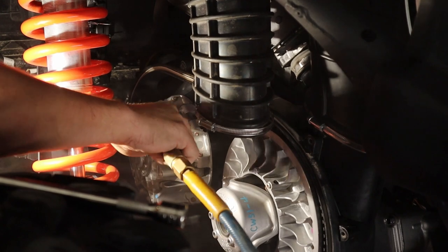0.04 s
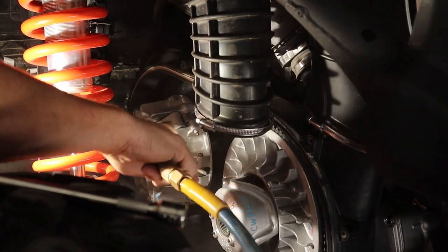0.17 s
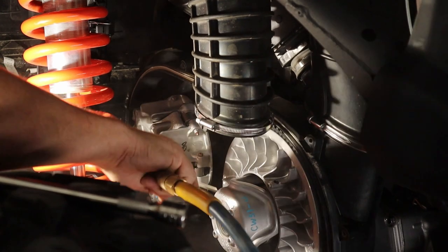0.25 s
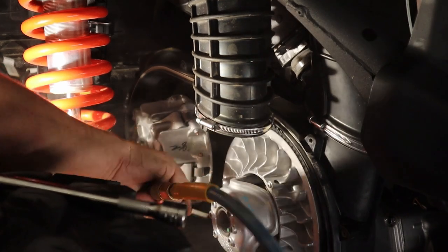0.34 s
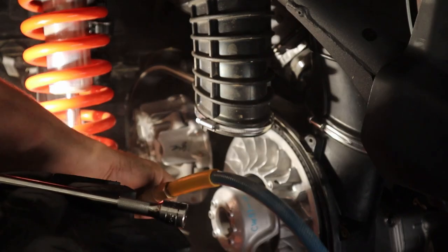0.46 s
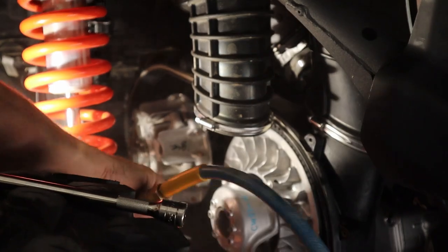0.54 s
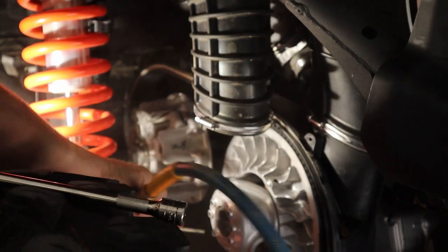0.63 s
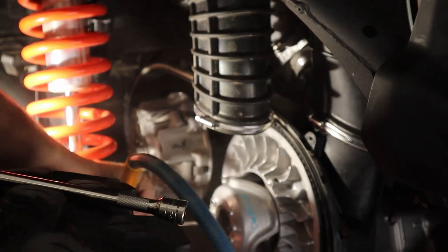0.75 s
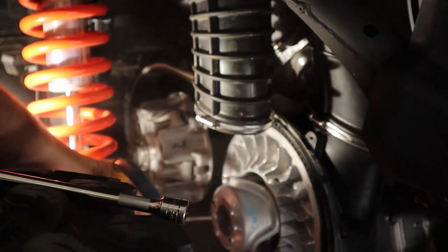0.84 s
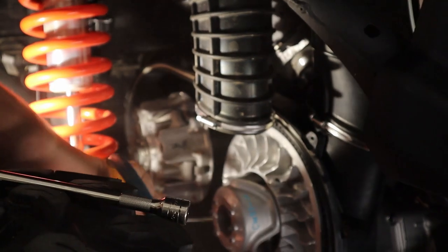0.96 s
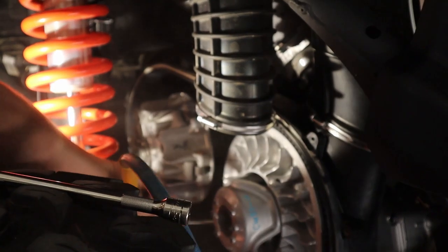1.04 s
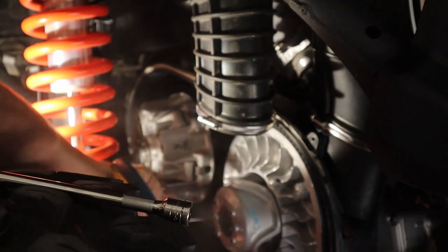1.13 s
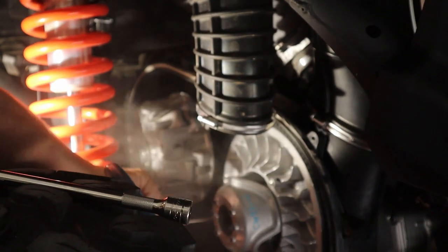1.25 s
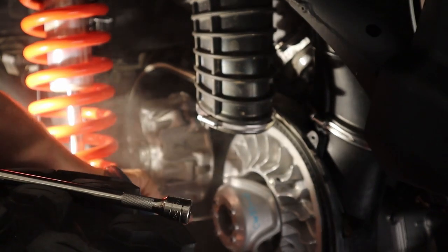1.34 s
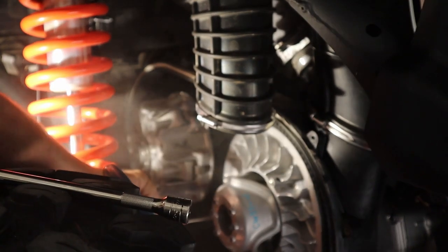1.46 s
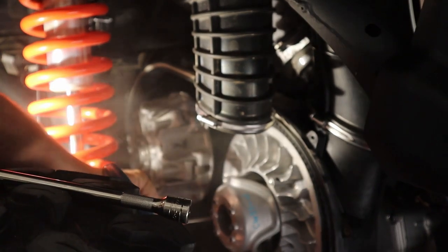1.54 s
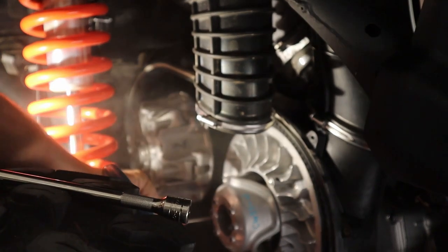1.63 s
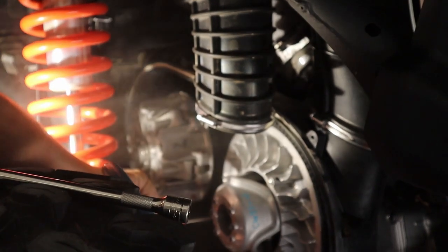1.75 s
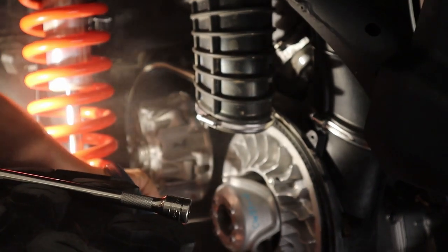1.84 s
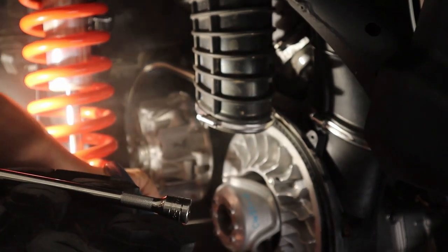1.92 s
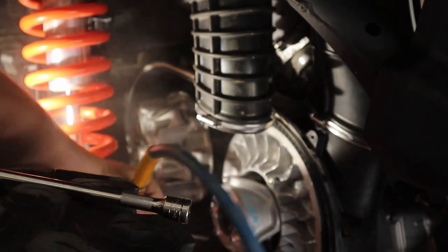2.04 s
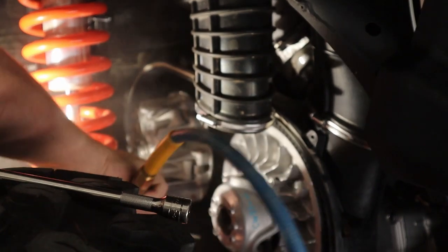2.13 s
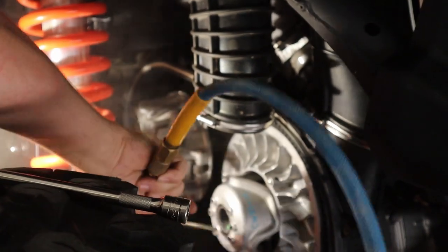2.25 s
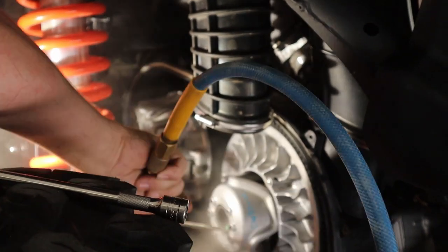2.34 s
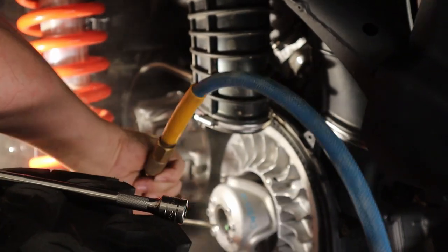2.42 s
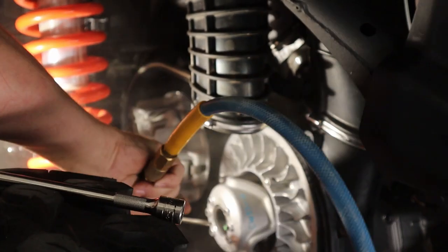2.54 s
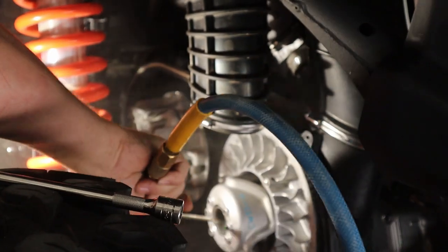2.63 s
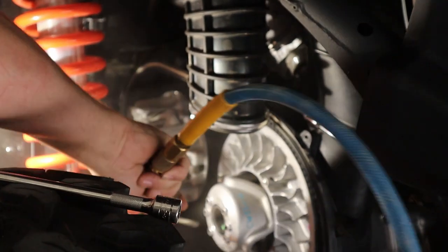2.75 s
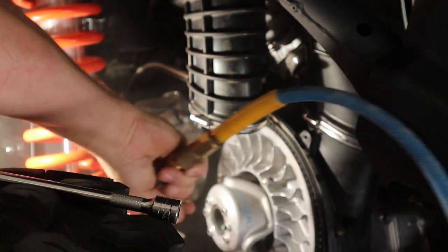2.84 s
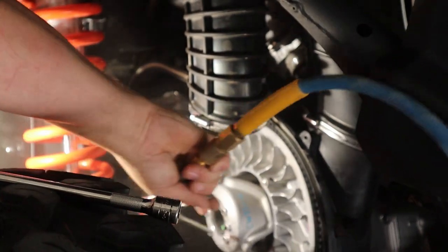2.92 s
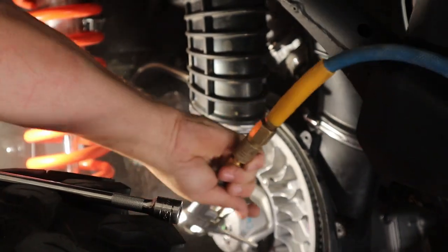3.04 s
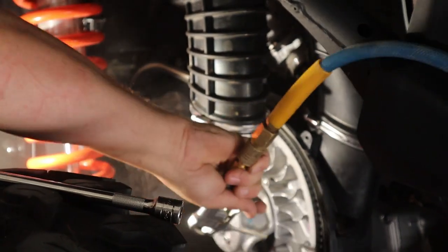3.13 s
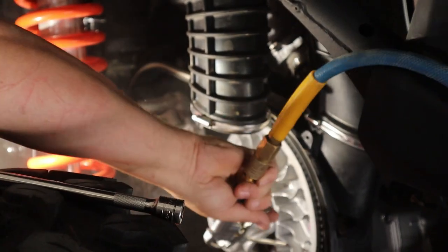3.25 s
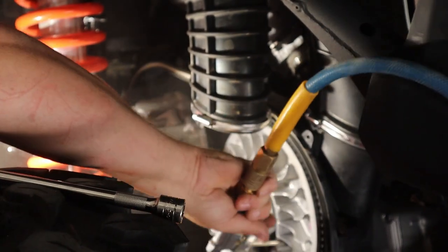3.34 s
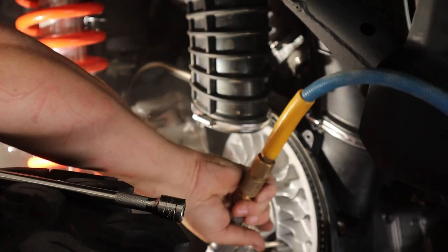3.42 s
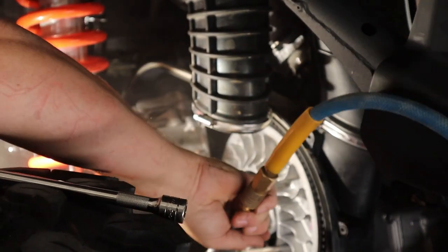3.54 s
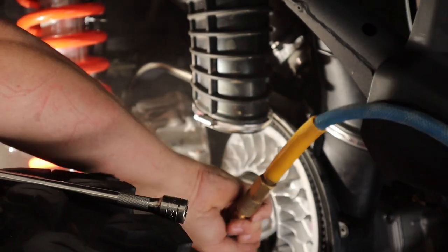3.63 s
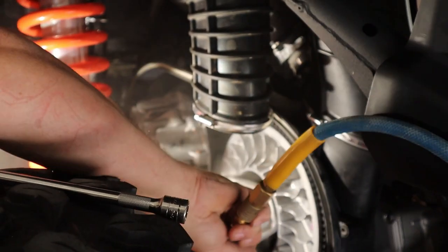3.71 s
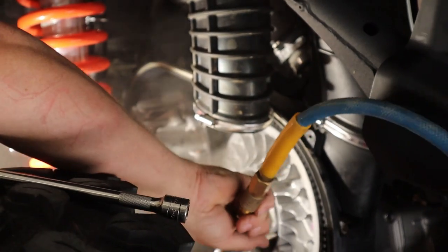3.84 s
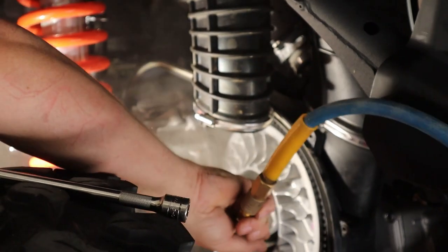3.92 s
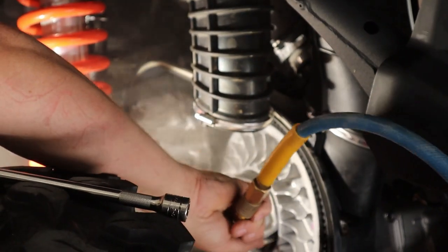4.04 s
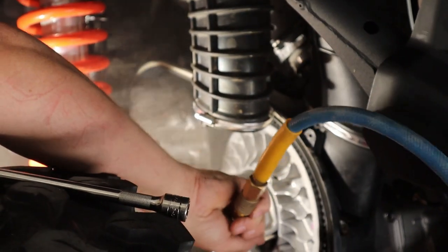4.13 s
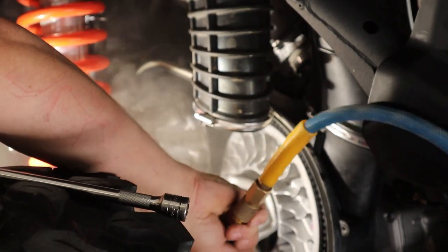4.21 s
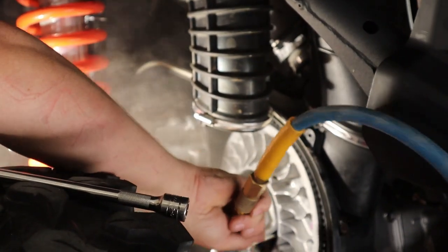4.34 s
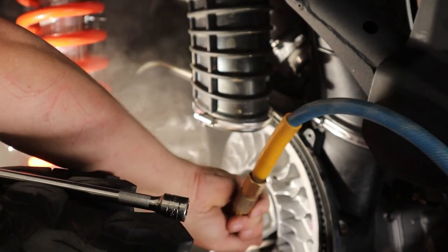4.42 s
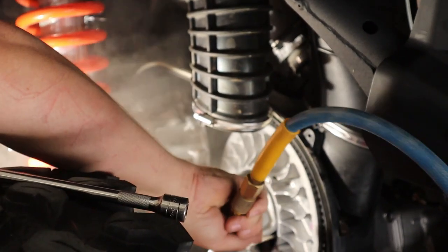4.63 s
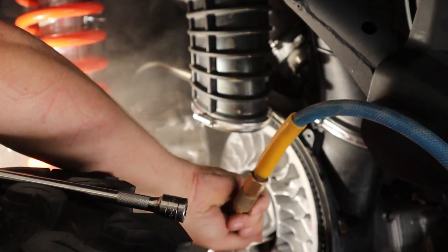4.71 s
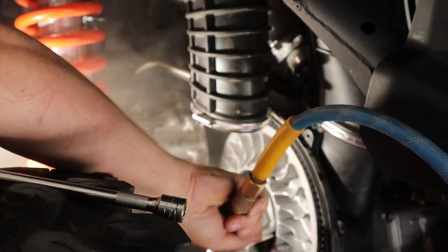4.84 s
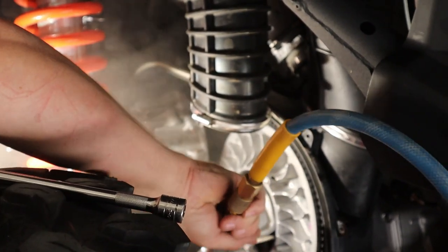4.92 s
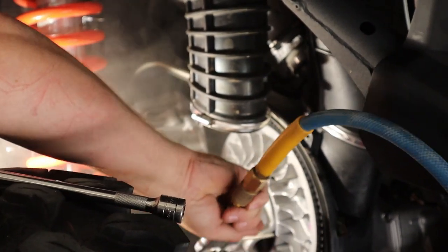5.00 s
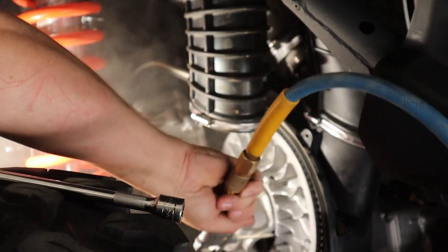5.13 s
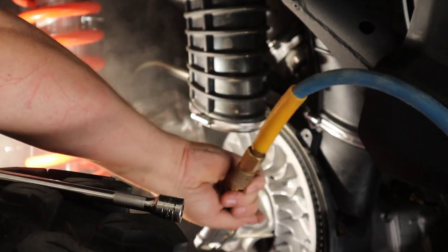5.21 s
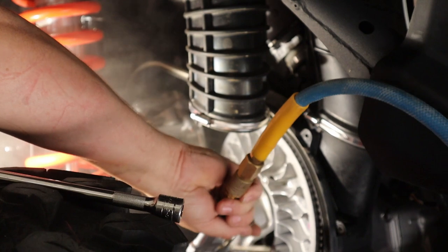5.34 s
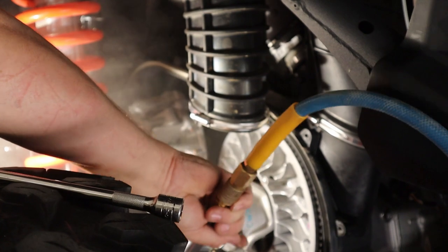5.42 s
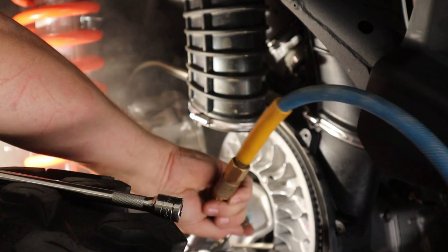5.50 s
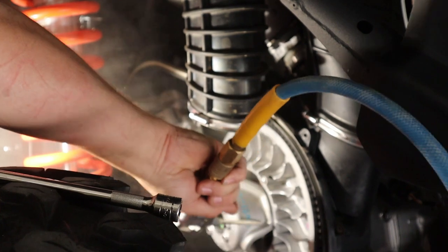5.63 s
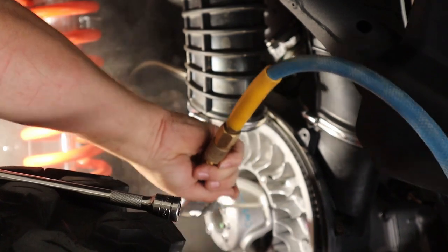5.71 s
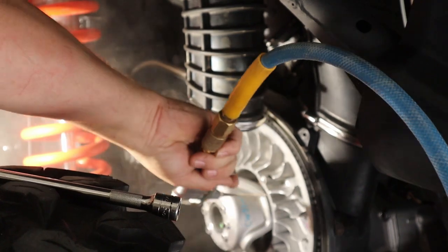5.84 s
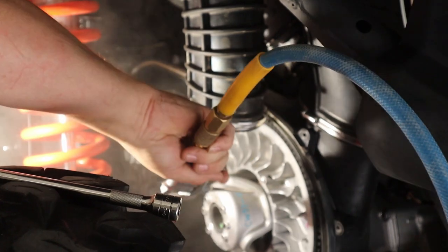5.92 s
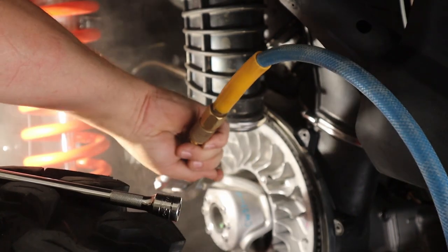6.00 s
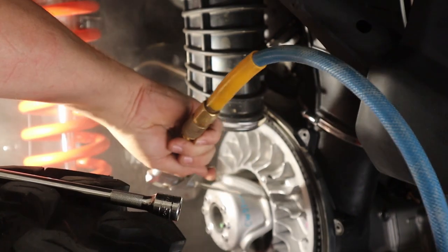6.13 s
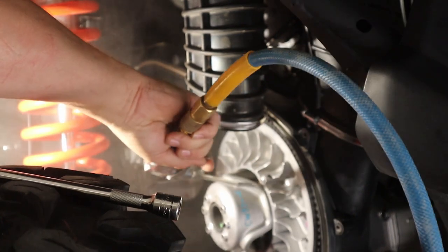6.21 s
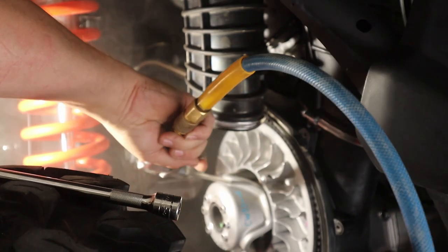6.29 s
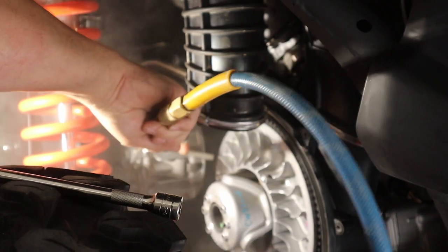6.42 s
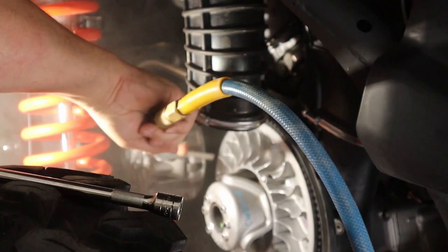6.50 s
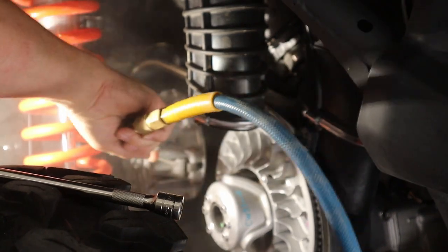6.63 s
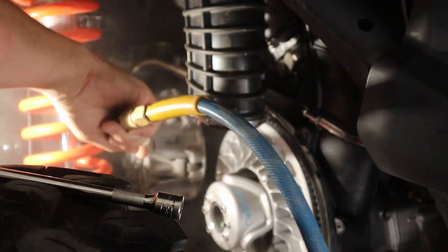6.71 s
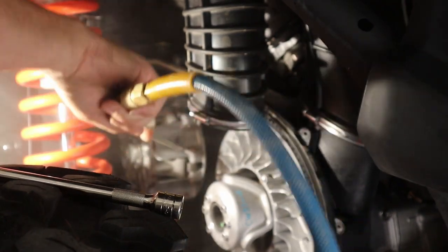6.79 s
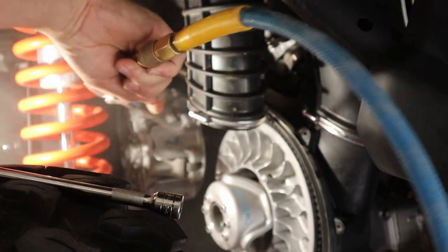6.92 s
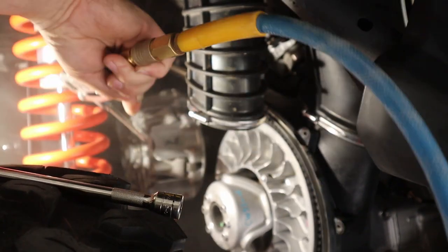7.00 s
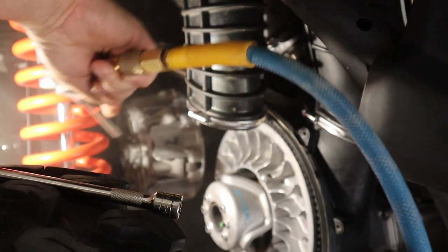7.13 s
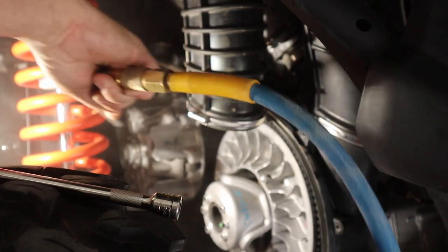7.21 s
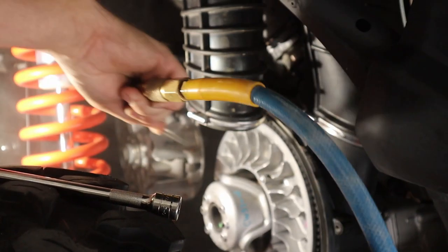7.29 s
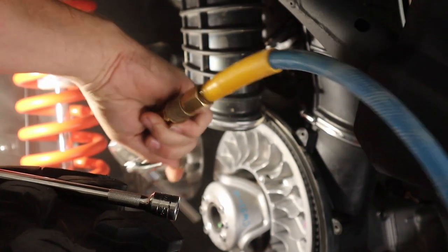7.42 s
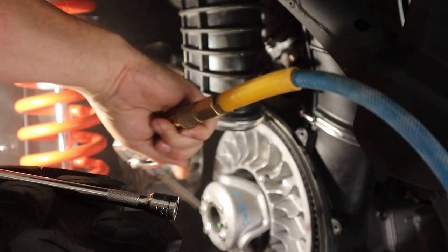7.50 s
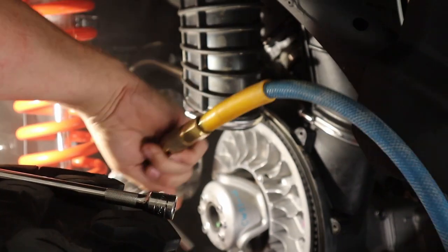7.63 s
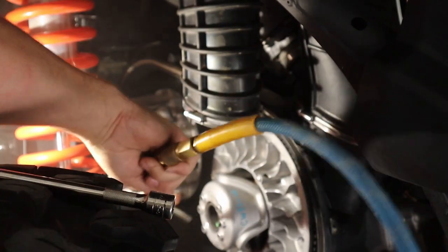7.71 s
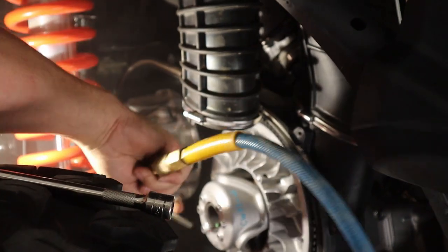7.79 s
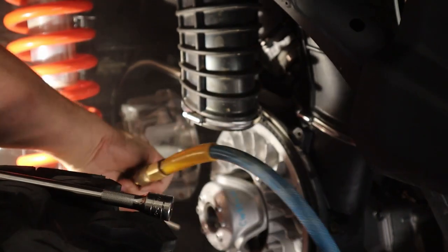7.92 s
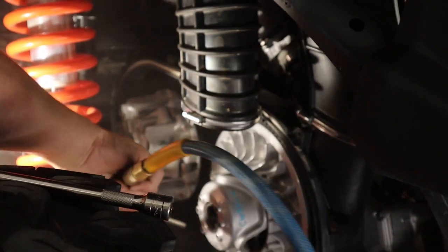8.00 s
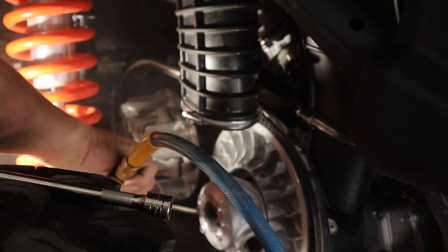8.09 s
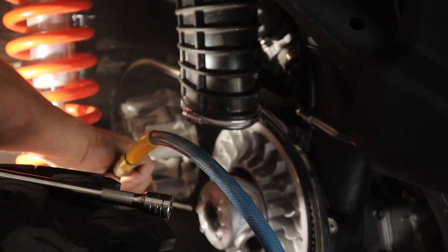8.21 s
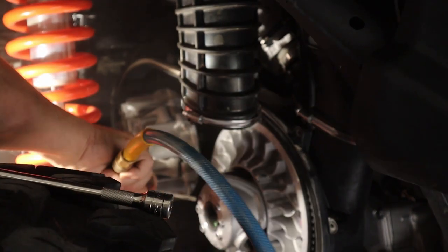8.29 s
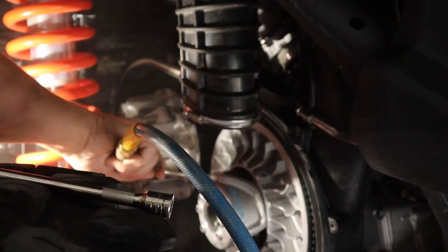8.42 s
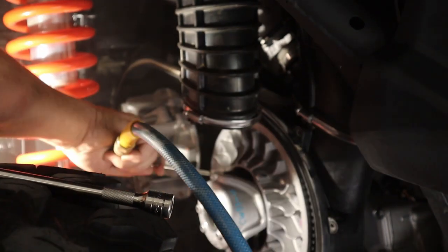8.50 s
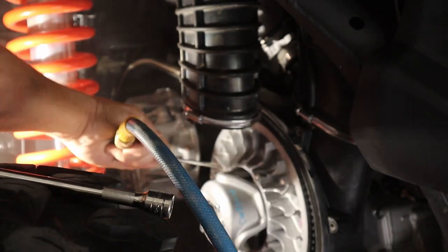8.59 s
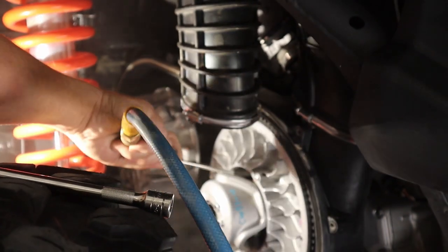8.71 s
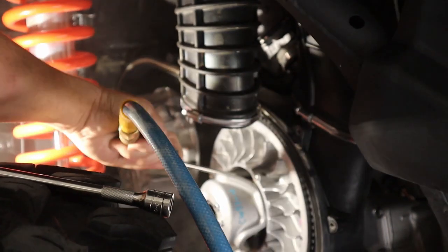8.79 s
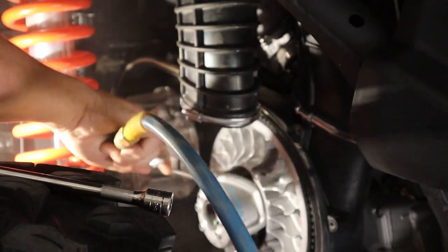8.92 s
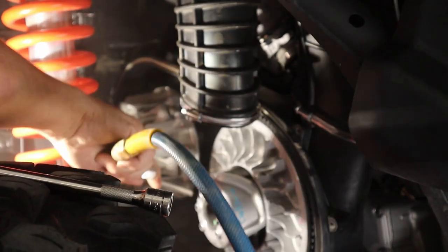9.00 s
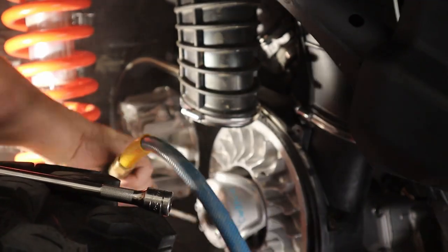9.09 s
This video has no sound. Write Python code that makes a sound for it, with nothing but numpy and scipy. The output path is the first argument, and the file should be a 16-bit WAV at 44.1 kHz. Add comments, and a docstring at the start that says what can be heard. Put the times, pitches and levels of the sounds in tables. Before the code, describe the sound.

Close, harsh jets of pressurised air start and stop abruptly against hollow metal parts, with small clinks and bumps between them.

```python
"""In a workshop, close to a mono microphone, a compressed-air blow gun blasts dust out of a machine's clutch.
Each trigger pull frees a jet of shaped noise that hisses, rasps, roars in the housing and buffets;
resonances colour it, and on sharp edges it whistles. Decaying modes and noise make the taps and bumps of
the gun, a thin stream leaks through the valve, panels and hall echo, and a steady ambience lies below."""
import sys
import numpy as np
from scipy import signal
from scipy.fft import rfft, irfft, next_fast_len
from scipy.io import wavfile
from scipy.ndimage import uniform_filter1d, map_coordinates

SR = 44100
rng = np.random.default_rng(int(sys.argv[2]) if len(sys.argv) > 2 else 0)


def master_out(mix):
    """Clip the mix to full scale and print it as 16-bit PCM to the path in sys.argv[1]."""
    frames = np.transpose(np.atleast_2d(mix))
    ceiling = np.clip(frames, -1, 1)
    pcm = np.round(ceiling * 32767).astype(np.int16)
    wavfile.write(sys.argv[1], SR, pcm)


N = 403515
T = np.arange(N) / SR  # time [s]

# Most table levels are relative, with a gain set by the source; edge tones and metal pings play as listed.
# Trigger pulls: (opens [s], closes [s], opening time [s], closing time [s], strength [dB])
TRIGGER_PULLS = [(-.01, 0.153, 0.018, 0.029, -0.5), (1.178, 1.404, .02, 0.014, 1.85),
                 (1.519, 1.694, 0.019, .016, 2.25), (1.755, 1.907, 0.02, .016, 2.5),
                 (1.953, 2.09, 0.012, 0.012, 1), (2.39, 2.608, 0.053, 0.019, -4),
                 (2.66, 2.853, 0.032, 0.017, -1), (3.725, 4.001, 0.018, .014, -1.9),
                 (4.099, 5.035, 0.028, 0.018, 0.14), (5.134, 5.296, 0.018, .014, -2),
                 (5.612, 7.73, 0.017, .044, -2), (8.263, 8.918, 0.015, 0.014, -2)]
# The hand aims the jet: (time [s], depth [0 on an open face, 1 inside a recess])
AIM_DEPTH = [(.09, 0.0073), (.145, 0.83), (1.2, 0.81), (2.1, 0.72), (2.4, 0.071), (2.86, .2), (3.73, 0.21),
             (3.78, 0.85), (3.95, 1), (4.12, .8), (4.65, 0.89), (4.8, 0.94), (5.3, 1), (5.61, 0),
             (5.66, 0.46), (5.69, 0.89), (7.73, 0.91), (8.38, 0.39), (8.57, .3), (8.75, 1), (8.87, 0.73)]
# The jet grazes rims as it wanders, one curve a pull: (time [s], lift of the hiss [dB])
RIM_GRAZES = [
    [(2.39, -8), (2.45, -3), (2.51, 3), (2.57, 0), (2.64, -4)],
    [(3.7, 2), (3.79, 5.5), (3.865, 7), (3.9, -0.5)],
    [(4.08, -2), (4.27, -1), (4.345, 6), (4.375, 0.5), (4.41, 4), (4.45, -2), (4.53, 2), (4.6, 5.5),
     (4.7, 2)],
    [(5.59, 3), (5.69, 4.5), (5.77, 11), (5.83, -1), (5.9, 8), (5.96, 3.5), (6.02, 7.5), (6.09, 7),
     (6.125, 1.5), (6.18, 2), (6.205, 10.5), (6.25, 7), (6.29, 2), (6.45, -0.5), (6.5, 12.5), (6.58, 6)],
    [(8.24, -2), (8.39, -4), (8.5, 1), (8.66, 1), (8.72, 7), (8.77, 3), (8.82, 10.5), (8.95, -1.5)],
]
# The gun is drawn back during the longest pull: (time [s], nozzle to metal [cm])
NOZZLE_GAP = [(6.39, 1.94), (6.42, 5.9), (6.49, 2.3), (6.62, 4.9), (6.76, 2.6), (7.0, 5), (7.1, 8.7),
              (7.25, 16), (7.38, 8.9), (7.55, 13), (7.73, 9.6), (8.2, 1.8)]
# Harsh swells of the rasp: (time [s], length [s], level [dB])
RASP_SWELLS = [(1.22, .07, -15.5), (1.55, .06, -19), (2.07, 0.084, -20), (3.75, 0.044, -15.5),
               (3.85, 0.046, -18), (4.99, 0.11, -22.5), (5.22, .14, -20.5), (5.9, 0.057, -15.5),
               (6.01, 0.049, -21.5), (6.56, 0.13, -17), (6.68, 0.091, -19), (6.82, 0.17, -30.5),
               (7.46, 0.093, -19.5), (7.645, 0.099, -22.5), (8.295, 0.063, -14.5), (8.35, 0.047, -17.5),
               (8.405, 0.034, -20), (8.72, 0.065, -17)]
# Whoomps as the jet catches a hollow: (time [s], length [s], level [dB])
HOLLOW_WHOOMPS = [(.14, 0.029, -11.5), (5.22, 0.18, -24), (5.695, 0.041, -15), (6.005, 0.032, -16),
                  (6.505, 0.031, -25.5), (6.69, 0.045, -22), (6.95, 0.23, -20.5), (7.17, 0.071, -29.5),
                  (7.405, 0.06, -19.5), (7.5, 0.11, -24), (7.65, 0.11, -16.5), (8.3, .05, -21.5),
                  (8.76, 0.13, -24.5)]

# Spectra of the flow: (frequency [Hz], density [dB per Hz])
HISS_SPECTRUM = [(300, -33.5), (2000, -19), (5000, -6), (6500, -7), (7600, -0.5), (9200, -0.5), (11500, -5),
                 (15500, -10.5)]
RASP_SPECTRUM = [(900, -27), (1650, -5.5), (2300, -4), (3100, 0), (3500, -2), (3900, -4), (4900, -5),
                 (6400, -12), (9000, -24.5), (15000, -45)]
ROAR_SPECTRUM = [(250, -29.5), (400, -11.5), (550, -11.5), (660, -4.5), (820, -3), (1100, -3.5),
                 (1400, 0.5), (1650, -6), (2400, -14), (6000, -29)]
BUFFET_SPECTRUM = [(25, -28.5), (80, -15.5), (150, -8.5), (250, 0), (310, -2), (400, 2.5), (560, -7.5),
                   (900, -17), (3000, -52.5)]

# Resonances of the bay around the clutch and of each part hit: (frequency [Hz], width [Hz], level [dB])
BAY_MODES = [(262, 21, -4.5), (465, 60, -2.5), (683, 160, 1.5), (914, 37, 3), (1063, 58, 7.5),
             (1270, 64, 2.5), (1448, 29, 3)]
CASE_MODES = [(1263, 270, -3), (1800, 49, 4), (2070, 57, -2), (2520, 110, -3), (3100, 160, -16),
              (3640, 220, -1), (4270, 240, 0), (5560, 230, 3.5), (9330, 350, 0), (10000, 350, -5)]
HOUSING_MODES = [(455, 92, -2.5), (1360, 160, -16.5), (2627, 84, 5), (3040, 100, 3.5), (3510, 220, -2),
                 (4230, 320, 4), (4740, 280, 0.5), (5720, 160, 3), (9400, 580, -18.5)]
HUB_MODES = [(650, 92, -16), (2105, 230, 7.5), (5760, 230, 6.5), (6920, 160, -2.5), (8900, 660, -2),
             (9800, 180, 0), (11700, 670, 1)]
FIN_MODES = [(2120, 570, -1), (2780, 920, 2.5), (3340, 76, 0.5), (4680, 300, -2.5), (7630, 490, -15.5)]

# Edge tones: (time [s], length [s], pitch [Hz], level [dB])
EDGE_TONES = [(5.645, 0.033, 3220, -15.5), (6.557, 0.057, 3260, -17), (6.559, 0.045, 2810, -12.5),
              (8.299, 0.075, 3230, -19), (8.345, 0.025, 3285, -7.5)]
# Leak while a finger rests on the trigger: (time [s], level [dB])
LEAK_LEVEL = [(3.335, -73.5), (3.355, -50.5), (3.41, -41), (3.47, -37), (3.5, -48.5), (3.62, -43),
              (3.66, -60), (3.69, -45), (3.73, -36), (3.75, -71)]
# Air through the barely open valve: (frequency [Hz], density [dB per Hz])
SEEP_SPECTRUM = [(300, -19.5), (1000, -22.5), (1600, -5), (2300, -4.5), (2550, -17), (3100, -4),
                 (4400, -18), (5100, -12), (6400, -24), (8800, -21), (9400, -11.5), (15500, -19)]
# Resonances of the valve: (frequency [Hz], width [Hz], level [dB])
VALVE_MODES = [(2280, 200, -3.5), (3040, 140, 1), (5150, 160, -4), (9500, 200, 11)]

# Nozzle on metal: (time [s], level [dB])
NOZZLE_TAPS = [(0.3812, -33), (0.7938, -40), (1.0457, -30), (2.278, -27.5), (3.3193, -46)]
# Ring of the tapped steel: (frequency [Hz], level [dB], t60 [s])
STEEL_MODES = [(1080, -0.5, .08), (1400, -1.5, .12), (4580, -9, .3), (6100, -12, .3), (7160, -5, 0.17),
               (10300, -11, 0.091)]
# Gun and hose bump the casing: (time [s], peak level [dB], t60 [s])
CASING_KNOCKS = [(.968, -37, .22), (1.437, -24, 0.15), (2.953, -16, 0.057), (3.237, -40.5, 0.064),
                 (3.318, -39, .1), (3.698, -21, 0.076)]
# Resonances of the casing: (frequency [Hz], width [Hz], level [dB])
CASING_MODES = [(221, 90, -0.5), (480, 200, -2), (716, 250, 0), (1080, 150, -16.5), (1472, 210, -12)]
# Thin metal left ringing by a contact: (time [s], frequency [Hz], level [dB], t60 [s])
METAL_PINGS = [(.381, 4119, -55, 1.1), (0.969, 1560, -52, 0.23), (.97, 720, -50.5, 0.33),
               (.97, 8060, -63.5, 0.47), (3.32, 1125, -44.5, .1)]

# Echo of the workshop: (frequency [Hz], t60 [s])
HALL_DECAY = [(150, .66), (1000, 0.63), (3000, 0.61), (7000, 0.68), (11000, 0.38), (15000, .33)]
# Tone of that echo: (frequency [Hz], level [dB])
HALL_COLOUR = [(100, 3.5), (600, 1.5), (5000, 0), (9000, -3.5), (15000, -4)]
# Background of the workshop: (frequency [Hz], density [dB per Hz])
AMBIENT_SPECTRUM = [(25, -18), (60, -7), (95, 0), (160, -18.5), (400, -17.5), (1200, -18.5), (2800, -34),
                    (5500, -25), (8500, -36), (15000, -44)]

# Where the nozzle points (from [s], to [s]); at other times into the housing
ON_CASE, ON_HUB, ON_FINS = (1.0, 2.25), (2.25, 3.2), (6.42, 8.68)
# A full hose blows this much harder [dB]; time constant of draining and refilling [s]
SURGE_DB, HOSE_S = 5, .24
# A steady jet, close up and deep in a recess [dB], ahead of the trims in jet()
HISS_DB, RASP_DB, ROAR_DB, BUFFET_DB = -23.5, -20.5, -19, -39.5
# Change on an open face, against inside a recess [dB]
OPEN_HISS_DB, OPEN_RASP_DB, OPEN_ROAR_DB = 6.5, -2.5, -15
GRAZE_RASP, GRAZE_ROAR = 0.33, -0.27  # dB for each dB that grazing lifts the hiss
NEAR_CM = 2  # the jet loses no level over a shorter gap [cm]
BUFFET_PER_ROAR, BUFFET_PER_GAP = 0.62, 0.48  # dB for each dB of roar, and for each dB lost over the gap
# The nozzle's own hiss with nothing in its way [dB], ahead of the trims in jet()
FREE_JET_DB = -28.5
FREE_JET_PER_GAP = 0.15  # dB gained for each dB lost over the gap, as the nozzle comes clear of the bay
SWELL_HISS_DB = -8  # hiss that a rasp swell adds, against its rasp [dB], ahead of the trims in jet()
TOP_HZ = 15800  # band limit of the recorder [Hz]


def jet(hiss_db, rasp_db, roar_db, buffet_db):
    """Fine eddies hiss, the jet breaking up on metal rasps, and big eddies roar and buffet in the hollows."""
    flutter = wobble(70)  # the jet flaps on the surface
    hiss = amp(hiss_db + 0.57 + 0.88 * flutter + 0.29 * wobble(25)) * noise(HISS_SPECTRUM)
    rasp = amp(rasp_db - 2.5 + .7 * flutter + 1.8 * wobble(35)) * noise(RASP_SPECTRUM)
    roar = amp(roar_db - 5.0 + 0.59 * flutter + 0.6 * wobble(30)) * noise(ROAR_SPECTRUM)
    buffet = amp(buffet_db + 3.1 * wobble(25)) * noise(BUFFET_SPECTRUM)
    return valve() * eddies(hiss + rasp + roar + buffet, patchy_db=1.6)


def valve(lead=0.0):
    """Opening of the trigger valve, 0 to 1, starting lead seconds early."""
    opening = np.zeros(N)
    for on, off, rise, fall, _ in TRIGGER_PULLS:
        lift = np.clip((T - on + lead) / (rise + lead), 0, 1) ** 2
        shut = np.clip(1 - (T - off) / fall, 0, 1) ** 1.1
        opening += lift * shut
    return opening


def pressure():
    """Drive of the jet in dB: pulls differ in strength; the hose drains while open and refills while shut."""
    opens, *_, strength_db = np.transpose(TRIGGER_PULLS)
    latest = np.maximum(np.searchsorted(opens, T) - 1, 0)
    keep = np.exp(-1 / (HOSE_S * SR))
    drained = signal.lfilter([1 - keep], [1, -keep], valve())
    return strength_db[latest] + SURGE_DB * (1 - drained)


def flow():
    """Levels in dB of hiss, rasp, roar and buffeting, from pressure, aim and distance to the metal."""
    exposed = 1 - np.clip(curves(AIM_DEPTH)[0], 0, 1)
    graze_db = sum(np.interp(T, *np.transpose(rows), left=0, right=0) for rows in RIM_GRAZES)
    gap_db = 20 * np.log10(np.maximum(curves(NOZZLE_GAP)[0] / NEAR_CM, 1))
    impact_db = pressure() - gap_db
    harsh = swells(RASP_SWELLS)
    whoomps = swells(HOLLOW_WHOOMPS)
    free_jet = amp(FREE_JET_DB + FREE_JET_PER_GAP * gap_db)
    spray = np.hypot(free_jet, amp(SWELL_HISS_DB) * harsh)
    hiss_db = together(impact_db + HISS_DB + OPEN_HISS_DB * exposed + graze_db, spray)
    rasp_db = together(impact_db + RASP_DB + OPEN_RASP_DB * exposed + GRAZE_RASP * graze_db, harsh)
    roar_db = together(impact_db + ROAR_DB + OPEN_ROAR_DB * exposed + GRAZE_ROAR * graze_db, whoomps)
    # buffeting grows with the roar, and with distance as the jet spreads into bigger eddies
    buffet_db = BUFFET_DB + BUFFET_PER_ROAR * (roar_db - ROAR_DB) + BUFFET_PER_GAP * gap_db
    return hiss_db, rasp_db, roar_db, buffet_db


def eddies(x, patchy_db):
    """Shifting turbulence lifts and drops patches of the spectrum."""
    z = signal.stft(x, nperseg=512)[2]
    over_hz = uniform_filter1d(rng.standard_normal(z.shape), size=6, axis=0)
    field = uniform_filter1d(over_hz, size=10, axis=1)
    return signal.istft(z * amp(patchy_db * unit(field)), nperseg=512)[1][:N]


def clutch(air, hiss_db, roar_db, depth_db=-0.5):
    """The bay and the part under the nozzle lend the jet their resonances."""
    air = air + resonate(air, BAY_MODES)
    case, hub, fins = during(*ON_CASE), during(*ON_HUB), during(*ON_FINS)
    # the housing speaks most when the jet roars inside it, least when it hisses past the rim
    inside = 1 / (1 + amp(hiss_db - roar_db - depth_db))
    housing = (1 - case - hub - fins) * inside
    out = amp(-1.49) * air
    out += amp(-3) * resonate(air * case, CASE_MODES)
    out += amp(2.5) * resonate(air * housing, HOUSING_MODES)
    out += amp(2.0) * resonate(air * hub, HUB_MODES)
    out += amp(-1.0) * resonate(air * fins, FIN_MODES)
    return out


def whistles(width_hz=70):
    """Crossing a sharp edge, the jet briefly locks into a breathy tone: noise in a narrow band."""
    out = np.zeros(N)
    for s, length, hz, db in EDGE_TONES:
        tone = unit(filtered(rng.standard_normal(N), lambda f: 1 / (1 + ((f - hz) / width_hz) ** 2)))
        out += swells([(s, length, db)]) * tone
    return valve() * out


def puffs(push_hz=90, db=-35):
    """The flow stopping at each release gives one soft low push, weaker when the valve closes slowly."""
    out = np.zeros(N)
    quickest = min(pull[3] for pull in TRIGGER_PULLS)
    for _, off, _, fall, _ in TRIGGER_PULLS:
        u = (T - off - fall / 2) * 2 * np.pi * push_hz
        push = 2 * u * np.exp(-np.minimum(u * u / 2, 50))
        out += amp(db) * (quickest / fall) ** 2 * push
    return out


def leak(seep_db=-41):
    """A thin stream sings through the valve as it lifts, and while a finger rests on the trigger."""
    air = noise(SEEP_SPECTRUM)
    stream = unit(air + amp(-5.0) * resonate(air, VALVE_MODES))
    resting = amp(curves(LEAK_LEVEL)[0] - 1.0)
    lifting = amp(seep_db) * valve(lead=0.037)
    return (resting + lifting) * stream


def contacts(tick_t60=0.037):
    """Bright nozzle taps, dull bumps on the casing and metal pings: noise bursts and decaying modes."""
    out, t = np.zeros(N), T[:SR]
    for s, db in NOZZLE_TAPS:
        ring = sum(ringing(hz, level + rng.normal(0, 2), t60) for hz, level, t60 in STEEL_MODES)
        scrape = unit(resonate(rng.standard_normal(SR), [(4300, 1000, 8.5), (8000, 6400, -6.5)]))
        tick = scrape * amp(-60 * t / tick_t60)
        add(out, s, amp(db - 7) * (tick + amp(-9.0) * ring))
    for s, db, t60 in CASING_KNOCKS:
        blow = rng.standard_normal(SR) * amp(-60 * t / t60)
        body = resonate(resonate(blow, CASING_MODES), [(797, 2400, 0.011)])  # a soft contact has little treble
        add(out, s, amp(db - 1.5) * body / np.abs(body).max())
    for s, hz, db, t60 in METAL_PINGS:
        add(out, s, ringing(hz, db, t60, waver=.7))
    return out


def panels(x, echo_db=-18, count=6):
    """Nearby panels return short echoes whose paths drift as the hand moves."""
    out = x.copy()
    for place in rng.uniform(-1, 1, count):
        delay = .007 + .004 * place + .00006 * wobble(2.5)  # [s]
        out += amp(echo_db) * np.interp(T - delay, T, x, left=0)
    return out / np.sqrt(1 + count * amp(2 * echo_db))


def hall(x, gap=0.017):
    """The workshop's echo: noise decaying at its own rate in each band, faded in over gap seconds."""
    hz, t, z = signal.stft(rng.standard_normal(SR), SR, nperseg=256)
    decay_db = along(HALL_COLOUR, hz)[:, None] - 60 * t / along(HALL_DECAY, hz)[:, None]
    tail = signal.istft(z * amp(decay_db), SR, nperseg=256)[1]
    tail = tail * np.clip(np.arange(len(tail)) / SR / gap, 0, 1)
    return signal.fftconvolve(x, tail / np.linalg.norm(tail))[:N]


def ambience(db=-62.0):
    """The steady background of the workshop, as coloured noise."""
    return amp(db) * noise(AMBIENT_SPECTRUM)


def amp(db):
    """Gain for a level in dB."""
    return 10 ** (np.asarray(db) / 20)


def unit(x):
    """x scaled to rms 1."""
    return x / np.sqrt(np.mean(x ** 2) + 1e-20)


def along(points, hz):
    """Values at hz, from (frequency [Hz], value) points on a log axis."""
    f, v = np.transpose(points)
    return np.interp(np.log(hz + 1), np.log(f + 1), v)


def curves(rows):
    """One value per sample for each column after the time."""
    s, *cols = np.transpose(rows)
    return [np.interp(T, s, c) for c in cols]


def wobble(rate):
    """A smooth random curve, rate knots a second."""
    return map_coordinates(rng.standard_normal(int(N * rate / SR) + 4), [T * rate])


def filtered(x, response):
    """x times a complex response of frequency."""
    size = next_fast_len(len(x) + SR // 4)
    return irfft(rfft(x, size) * response(np.fft.rfftfreq(size, 1 / SR)), size)[:len(x)]


def noise(spectrum):
    """Coloured noise of rms 1."""
    return unit(filtered(rng.standard_normal(N), lambda hz: amp(along(spectrum, hz))))


def resonate(x, modes):
    """x through parallel resonances: (frequency [Hz], width [Hz], level [dB])."""
    def response(f):
        return sum(amp(db) * 1j * f * w / (c * c - f * f + 1j * f * w) for c, w, db in modes)
    return filtered(x, response)


def add(track, s, sound):
    """Mix a short sound into a track at time s."""
    part = track[max(round(s * SR), 0):][:len(sound)]
    part += sound[:len(part)]


def during(start, end):
    """1 between two times and 0 outside, with soft edges."""
    return uniform_filter1d(1.0 * ((T > start) & (T < end)), size=2000)


def ringing(hz, db, t60, waver=1.0):
    """One second of a decaying mode whose phase wanders as the contact rubs."""
    t = T[:SR]
    wander = waver * map_coordinates(rng.standard_normal(64), [t * 60])
    return amp(db - 60 * t / t60) * np.sin(2 * np.pi * hz * t + wander)


def swells(rows):
    """Summed gain of bell-shaped swells: (time [s], length [s], level [dB])."""
    return sum(amp(db) * np.exp(-(2 * (T - s) / length) ** 2) for s, length, db in rows)


def together(db, gain):
    """Level in dB of two unrelated noises, one given in dB and one as a gain."""
    return 10 * np.log10(amp(db) ** 2 + gain ** 2)


def scene():
    """Mix the close sound, the hall and the ambience; both channels carry the same mono signal."""
    hiss_db, rasp_db, roar_db, buffet_db = flow()
    air = jet(hiss_db, rasp_db, roar_db, buffet_db)
    coloured = clutch(air, hiss_db, roar_db)
    small = whistles() + leak()
    taps = contacts()
    near = panels(coloured + small) + puffs() + taps
    # the hall gets mostly the open jet; only the exposed hub sends it all of its ring
    let_out = np.maximum(amp(-9), during(*ON_HUB))
    room = hall(let_out * coloured + amp(1.5) * (1 - let_out) * air + small + taps)
    mono = near + amp(-12.5) * room + ambience()
    return np.array([mono, mono])


def record(dry):
    """The recorder rounds the highest peaks and keeps nothing above its band limit."""
    rounded = dry / (1 + np.abs(dry) ** 8) ** (1 / 8)
    low_pass = signal.firwin(501, TOP_HZ, fs=SR, window="blackman")
    return signal.fftconvolve(rounded, low_pass[None], mode="same", axes=1)


dry = scene()
out = record(dry)
master_out(out)
```